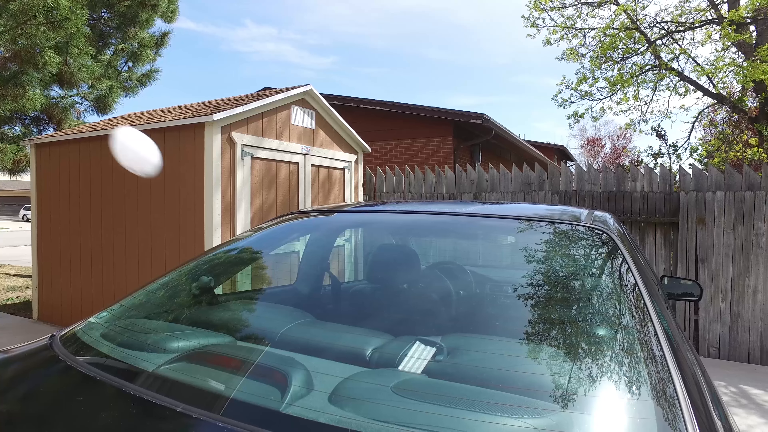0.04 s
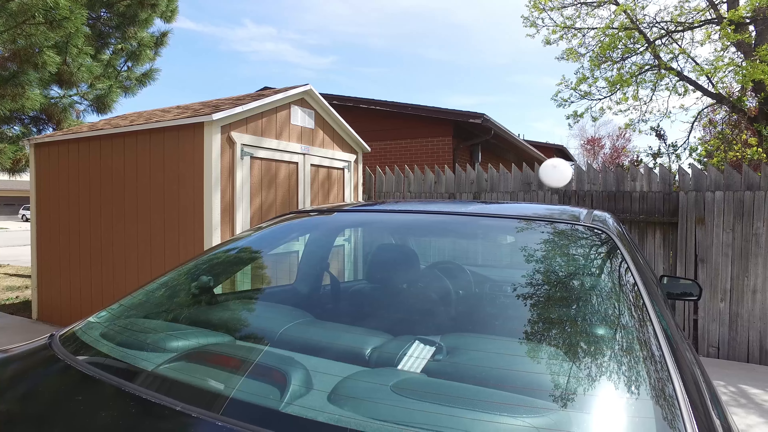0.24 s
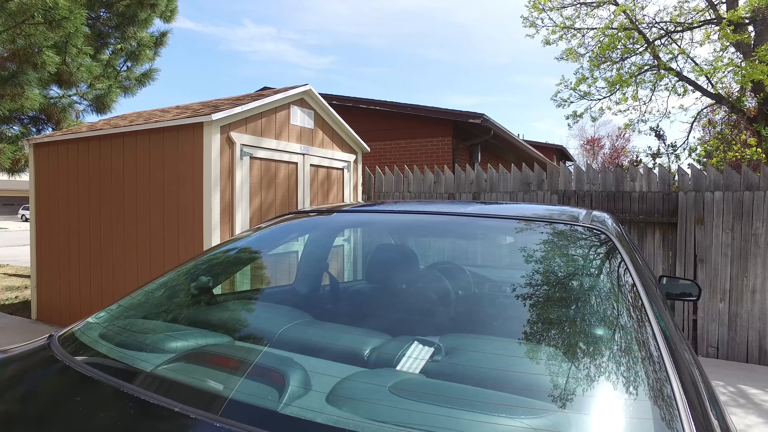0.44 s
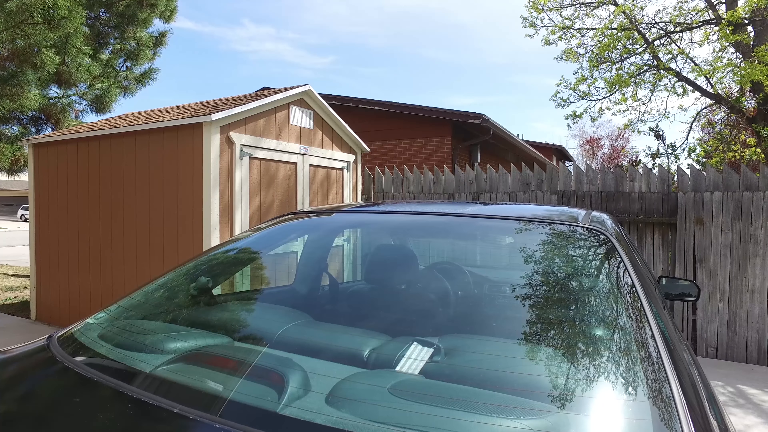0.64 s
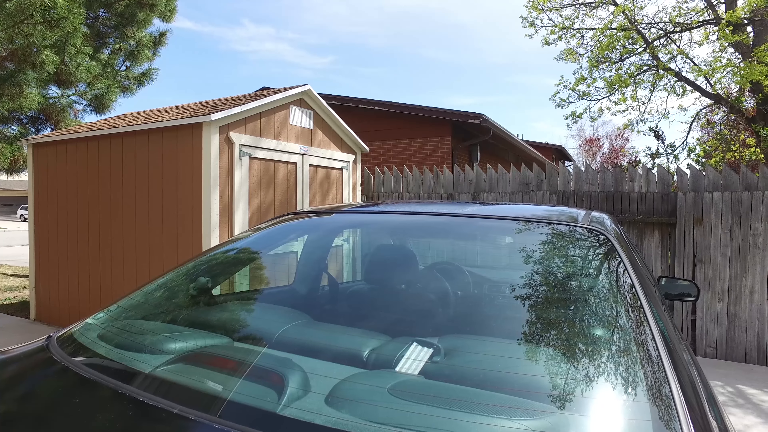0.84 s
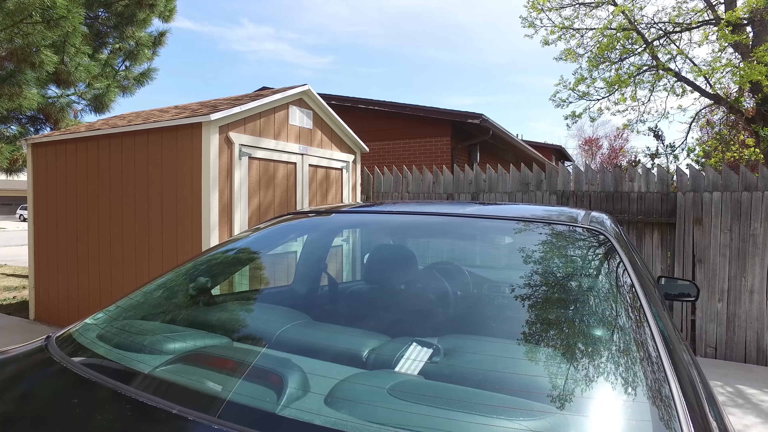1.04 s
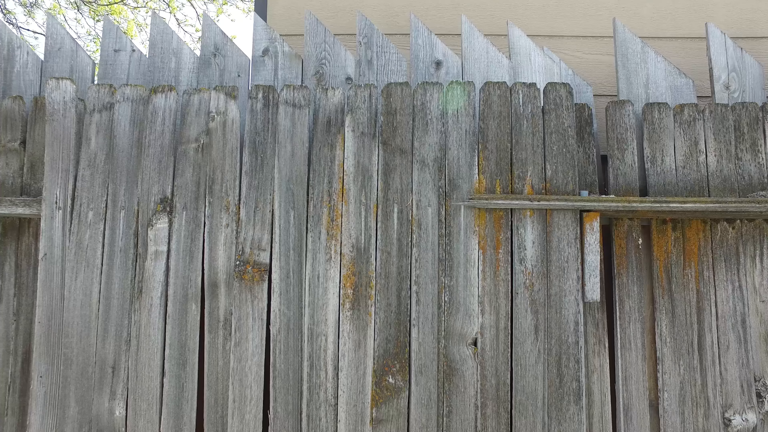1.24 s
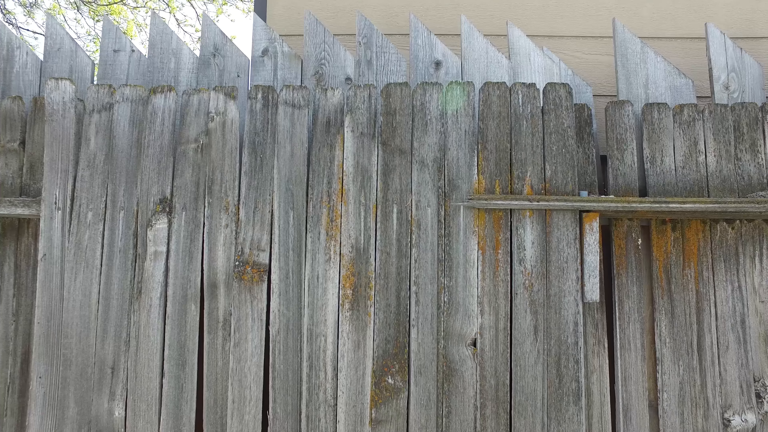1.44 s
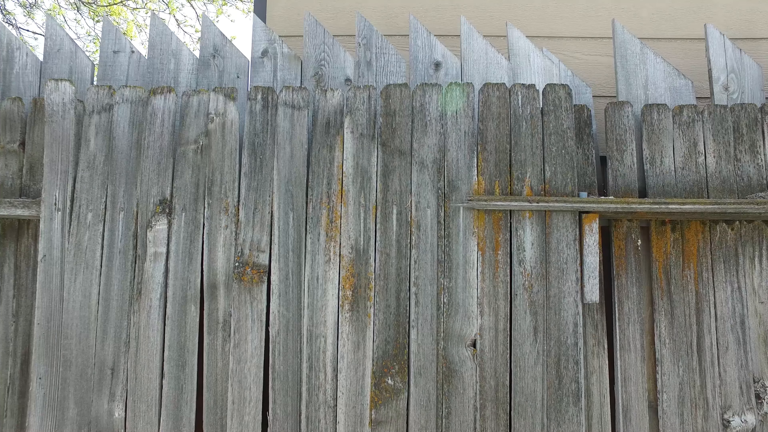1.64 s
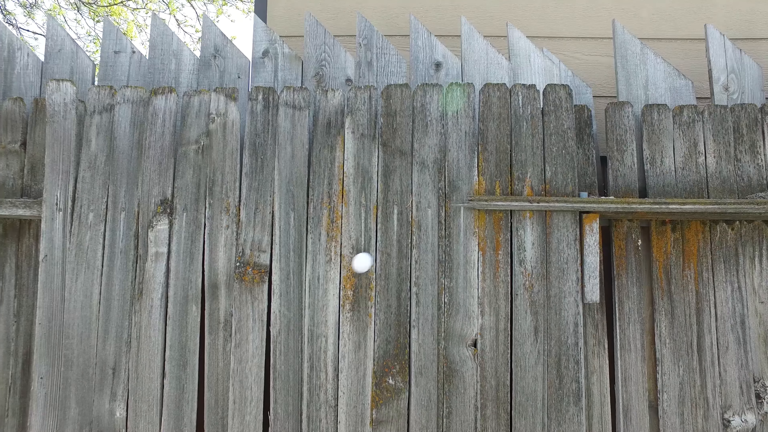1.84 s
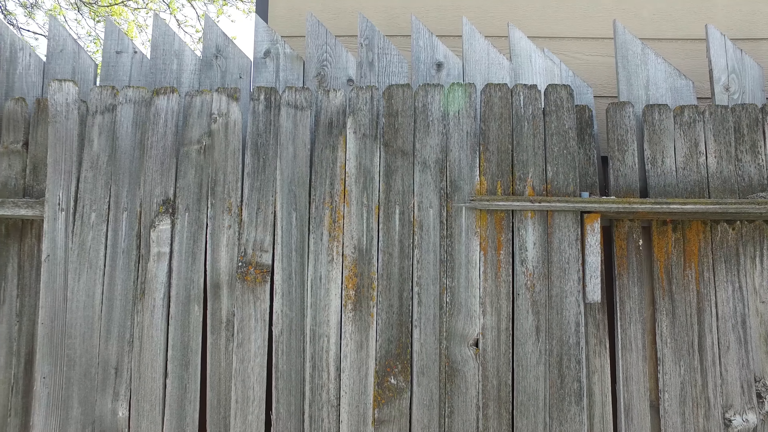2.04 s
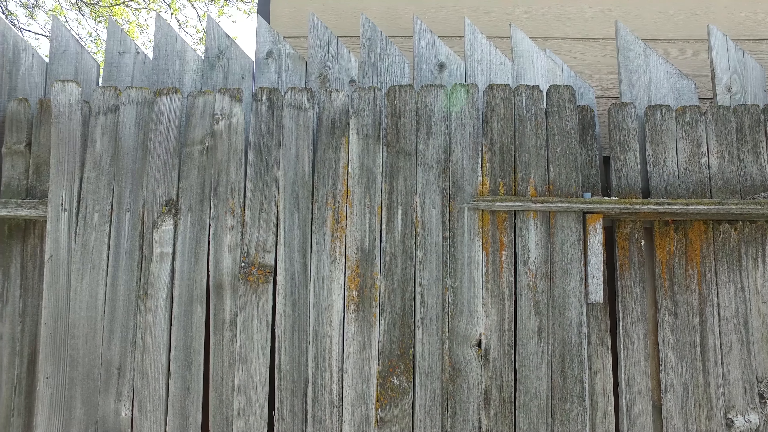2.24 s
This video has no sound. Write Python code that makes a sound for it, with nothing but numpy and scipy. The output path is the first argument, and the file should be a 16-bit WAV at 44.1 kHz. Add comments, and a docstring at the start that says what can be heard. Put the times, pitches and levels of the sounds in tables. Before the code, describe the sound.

A small hard ball hits a car windscreen at about 0.2 seconds, a sharp crack with a short knock and a tiny high ping. A faint dull bounce follows near 1 second. At about 1.9 seconds the ball strikes a wooden fence board with a dry clack. Both hits die quickly with a slight outdoor echo, over a low, quiet rumble of distant traffic and breeze.

```python
"""Ball on windscreen and fence

A small hard ball hits a car windscreen; the scene changes and it hits a wooden fence in a quiet yard.
Each blow layers a push of air, a contact crack, the knock of the surface and a high ping from the ball.
The yard throws back a faint echo, and the ball lands softly over distant traffic and a rumble of breeze."""
import sys
import numpy as np
from scipy import signal
from scipy.fft import rfft, irfft
from scipy.io import wavfile

SR = 44100
rng = np.random.default_rng(int(sys.argv[2]) if len(sys.argv) > 2 else 0)


def wav_record(signal):
    """Record a signal, one row per channel, as 16-bit PCM in the file named by sys.argv[1]."""
    frames = np.transpose(np.atleast_2d(signal))
    bounded = np.clip(frames, -1, 1)
    # unit amplitude maps onto the largest positive 16-bit level
    quanta = np.round(bounded * 32767).astype(np.int16)
    wavfile.write(sys.argv[1], SR, quanta)


N = 101429

# ringing modes of the windscreen and the fence board: f/Hz, level/dB, t60/s
GLASS_MODES = [(145, -27, .15), (222, -35, .14), (325, -27, .13), (385, -25, .13), (468, -27, .17),
               (548, -26, .14), (680, -22, .055), (830, -7, .044), (1092, -22, .07), (1200, -25, .075),
               (1450, -18, .055), (1680, -20, .048), (1940, -21, .04), (2110, -23, .037), (3350, -12, .013),
               (3850, -19, .018)]
BOARD_MODES = [(262, -17, .06), (348, -21, .125), (420, -8, .06), (462, -23, .125), (670, -16, .058),
               (825, -19, .095), (915, -20, .04), (1200, -10, .048), (1375, -17, .075), (1540, -11, .05),
               (1625, -5, .048), (1795, -10, .044), (1945, -10, .042), (2430, -26, .034), (3250, -19, .034)]
# ping of the ball: f/Hz, level on glass/dB, level on wood/dB, t60/s
BALL_MODES = [(7100, -26, -29, .011), (8450, -11, -13, .025), (8850, -19, -26, .015), (9890, -5, -24, .014),
              (11400, -17, -28, .011), (11900, -21, -31, .015)]
# body of each surface, a crowd of weak, close modes: f/Hz, relative level/dB, t60/s
GLASS_BODY = [(80, -19, .22), (350, 0, .2), (600, -4, .16), (900, -7, .14), (1400, -3, .125),
              (1900, -4, .085), (2600, -10, .07), (3700, -6, .075), (4400, -14, .065), (5500, -13, .06),
              (7000, -18, .045), (10000, -9, .042), (12000, -12, .038), (15000, -32, .02)]
FENCE_BODY = [(130, -40, .08), (350, 2, .12), (900, 1, .08), (1800, 5, .07), (2600, -4, .065),
              (3600, -3, .06), (4500, -11, .068), (5500, -13, .075), (10000, -7, .055), (12000, -10, .05),
              (15000, -27, .025)]
# crack of the contact itself: f/Hz, level/dB, t60/s
GLASS_CRACK = [(500, -20, .006), (1800, -3, .008), (2600, -11, .008), (3300, 3, .011), (3900, 1, .011),
               (4400, -22, .007), (5200, 1, .007), (6200, -24, .006), (7200, -9, .007), (10000, -1, .008),
               (12000, -4, .008), (13200, -15, .006), (16000, -30, .005)]
FENCE_CRACK = [(500, -14, .006), (2000, 1, .01), (3300, -3, .009), (4300, -18, .008), (5200, -26, .008),
               (7000, -8, .008), (11000, -10, .008), (13500, -24, .008), (16000, -36, .006)]
# soft far bounce: t/s, relative level/dB, f/Hz, t60/s
BOUNCES = [(1.0065, -27, 570, .012)]
# early reflections off near walls: delay/s, level re echo tail/dB
WALLS = [(.0152, -6), (.0195, -11), (.030, -13), (.067, -20)]
# echo tail of the yard: f/Hz, relative level/dB, t60/s
YARD_TAIL = [(100, 0, .4), (500, 3, .33), (1300, -2, .38), (2000, -7, .33), (4000, -3, .27),
             (6500, -7, .25), (8400, -2, .27), (9800, -10, .24), (11500, -4, .25), (15000, -20, .15)]
# beds of traffic and breeze by the car and by the fence: f/Hz, relative level/dB
CAR_BED = [(12, -30), (20, 0), (29, -2), (38, -9), (106, -13), (144, -22), (225, -11), (565, -26),
           (881, -21), (1130, -20), (1300, -27), (1870, -33), (3850, -50), (14300, -55), (15500, -60)]
FENCE_BED = [(12, -29), (20, -4), (38, -7), (65, -5), (87, -15), (110, -15), (145, -11), (185, -19),
             (450, -24), (900, -27), (1800, -35), (3000, -43), (5850, -50), (14300, -50), (15500, -55)]
# traffic swell by the car: t/s, gain/dB
TRAFFIC_SWELL = [(0, 0), (.8, .5), (1.14, 3)]
# fader of a soft high hiss by the car: t/s, level/dB
HISS_FADER = [(0, -74), (.9, -74), (1.06, -66), (1.14, -65)]
# distant hum by the fence: f/Hz, rms level/dB
HUM = [(61, -60)]


def windscreen(ping_delay_s=.0011):
    """The ball knocks the glass and pings as it springs off."""
    crack = dying_noise(GLASS_CRACK)
    knock = ring(GLASS_MODES, rise_s=.0005) + amp(-18) * dying_noise(GLASS_BODY)
    hit = crack + amp(-1.5) * push(contact_s=.0011) + knock
    add(hit, .0152, amp(-19) * crack)  # the bonnet throws the crack back
    add(hit, ping_delay_s, ping([(hz, db, t60) for hz, db, _, t60 in BALL_MODES]))
    return yard(hit, echo_db=-26.5)


def fence(ping_delay_s=.0001, low_cut_hz=210):
    """The ball knocks a loose board, which slaps once against its rail."""
    attack = amp(-2) * push(contact_s=.0009) + dying_noise(FENCE_CRACK)
    knock = ring(BOARD_MODES, rise_s=.007) + amp(-18) * dying_noise(FENCE_BODY)
    hit = attack + knock
    add(hit, .0042, amp(-5) * attack)  # slap on the rail
    add(hit, ping_delay_s, ping([(hz, db, t60) for hz, _, db, t60 in BALL_MODES]))
    # narrow boards radiate little bass
    low_cut = signal.butter(5, low_cut_hz, "high", fs=SR, output="sos")
    return yard(signal.sosfilt(low_cut, hit), echo_db=-30.5)


def ping(modes):
    """The hard ball rings bright and short, all modes starting in phase."""
    return ring(modes, rise_s=.0001, alternate=False)


def push(contact_s):
    """One swing of air pressure while the ball is in contact."""
    progress = seconds() / contact_s
    return np.sin(2 * np.pi * progress) * (progress < 1)


def ring(modes, rise_s, alternate=True):
    """Dying sines; in a plate, neighbouring modes swing in opposite directions."""
    t = seconds()
    sign = -1 if alternate else 1
    waves = sum(sign ** k * amp(db) * decay(t, t60) * np.sin(2 * np.pi * hz * t)
                for k, (hz, db, t60) in enumerate(modes))
    return waves * (1 - np.exp(-t / rise_s))


def dying_noise(table, bands=48):
    """A noise burst whose bands each start at their own level and die at their own speed."""
    t = seconds()
    hz = np.fft.rfftfreq(len(t), 1 / SR)
    centres = np.geomspace(60, 16000, bands)
    white = rfft(rng.choice([-1., 1.], len(t)))
    burst = 0
    for centre, share in zip(centres, np.eye(bands)):
        band = irfft(white * np.interp(hz, centres, share), len(t))
        burst += band * amp(read(table, centre)) * decay(t, read(table, centre, column=2))
    return burst


def bounce(db, hz, t60, rise_s=.0015):
    """A dull tap as the ball comes down farther off."""
    t = seconds()
    envelope = decay(t, t60) * np.minimum(t / rise_s, 1) ** 2
    return 2 * amp(db) * envelope * np.sin(2 * np.pi * hz * t)


def scuff(hz=4500, length_s=.025):
    """A brief brush of noise as the ball lands on the ground."""
    grit = noise([(hz / 4, -20), (hz, 0), (hz * 2, -20)])
    window = np.hanning(int(length_s * SR))
    return window * grit[:len(window)]


def yard(hit, echo_db, build_s=.02):
    """The direct hit, a few wall reflections and a thin scattered tail."""
    tail = dying_noise(YARD_TAIL) * (1 - np.exp(-seconds() / build_s))
    response = amp(echo_db) * tail / np.linalg.norm(tail)
    response[0] += 1  # direct sound
    for delay, db in WALLS:
        response[round(delay * SR)] += amp(db + echo_db)
    return signal.fftconvolve(hit, response)


def background(car_end_s=1.142, fence_start_s=1.175, fade_s=.002):
    """Traffic and breeze: with hiss by the car, then, after a short gap, with hum by the fence."""
    t = np.arange(N) / SR
    traffic = amp(-48 + np.interp(t, *np.transpose(TRAFFIC_SWELL))) * noise(CAR_BED)
    hiss = noise([(500, -6), (2000, 5), (3500, 1), (6000, -4), (10000, -7), (15000, -16)])
    hiss *= amp(np.interp(t, *np.transpose(HISS_FADER)))
    hum = sum(amp(db) * np.sqrt(2) * np.sin(2 * np.pi * (hz * t + rng.random())) for hz, db in HUM)
    by_fence = amp(-50) * noise(FENCE_BED) + hum
    fade_out = np.clip((car_end_s - t) / fade_s, 0, 1)
    fade_in = np.clip((t - fence_start_s) / fade_s, 0, 1)
    return (traffic + hiss) * fade_out + by_fence * fade_in


def noise(spectrum):
    """Steady noise of a given colour, rms 1."""
    colour = amp(read(spectrum, np.fft.rfftfreq(N, 1 / SR)))
    bed = irfft(rfft(rng.standard_normal(N)) * colour, N)
    return bed / np.sqrt(np.mean(bed ** 2))


def amp(db):
    """Decibels to gain."""
    return 10 ** (np.asarray(db) / 20)


def decay(t, t60):
    """Envelope that falls by 60 dB in t60."""
    return 1000. ** (-t / t60)


def seconds():
    """Half-second time axis for one blow."""
    return np.arange(SR // 2) / SR


def read(table, hz, column=1):
    """Reads one column of a table on a log-frequency axis."""
    columns = np.transpose(table)
    return np.interp(np.log(hz + 1), np.log(columns[0] + 1), columns[column])


def add(mix, start_s, sound):
    """Mixes a sound in at its start time."""
    part = mix[round(start_s * SR):][:len(sound)]
    part += sound[:len(part)]


def scene():
    """Both blows and their landings over the background, in mono."""
    mix = background()
    add(mix, .2339, windscreen())
    add(mix, 1.9025, fence())
    add(mix, 2.18, amp(-66) * scuff())
    for start_s, db, hz, t60 in BOUNCES:
        add(mix, start_s, bounce(db, hz, t60))
    return mix[None]


def record(dry, ceiling=.9, high_cut_hz=15700):
    """The microphone soft-clips the peaks, then a steep high cut trims the top."""
    squeezed = ceiling * np.tanh(dry / ceiling)
    high_cut = signal.firwin(255, high_cut_hz, window=("kaiser", 9), fs=SR)
    return signal.oaconvolve(squeezed, high_cut[None], "same")


dry = scene()
out = record(dry)
wav_record(out)
```